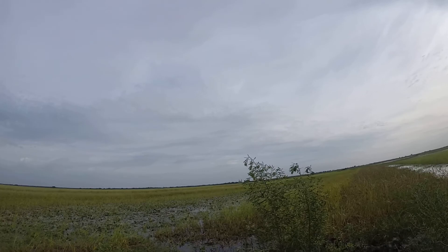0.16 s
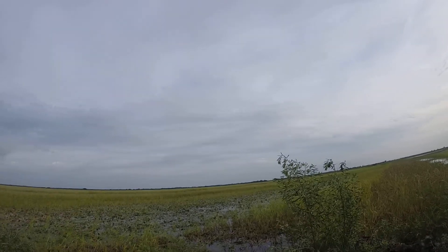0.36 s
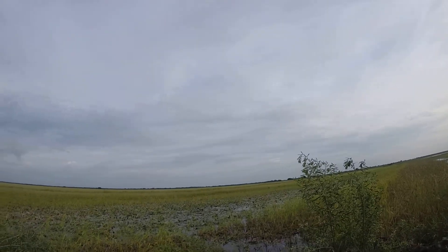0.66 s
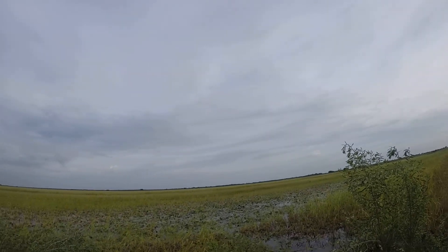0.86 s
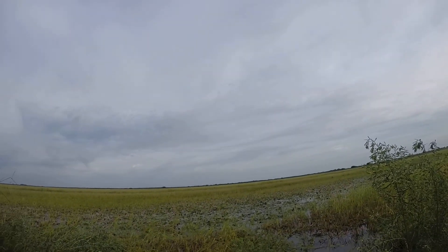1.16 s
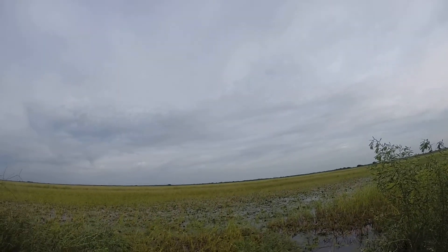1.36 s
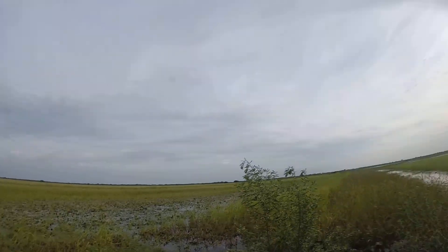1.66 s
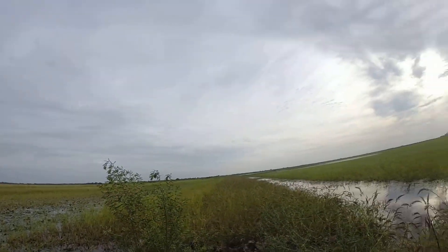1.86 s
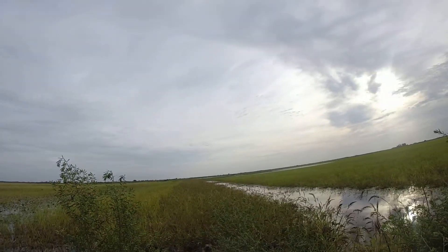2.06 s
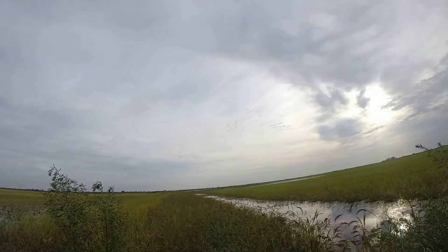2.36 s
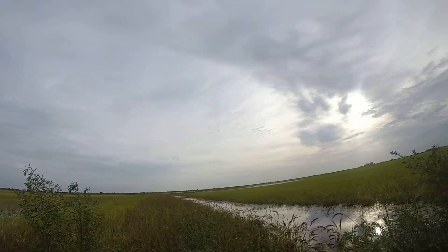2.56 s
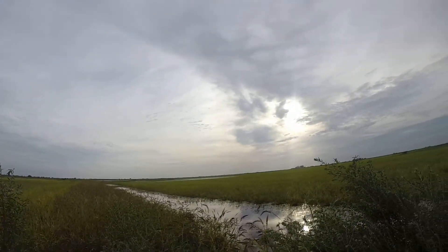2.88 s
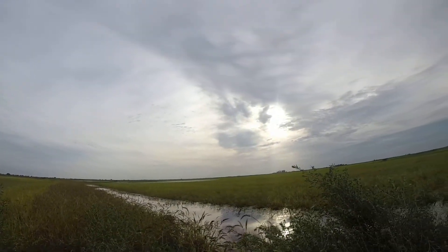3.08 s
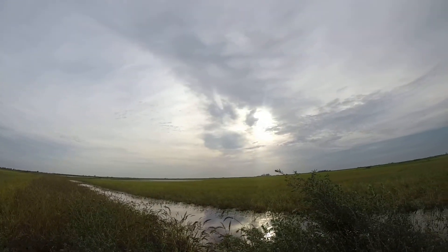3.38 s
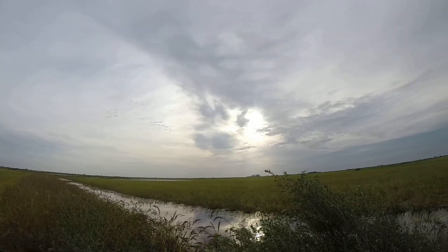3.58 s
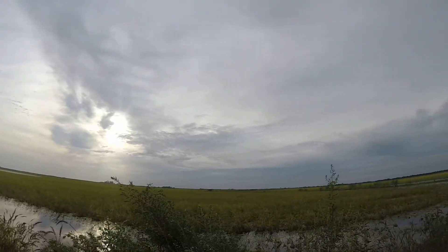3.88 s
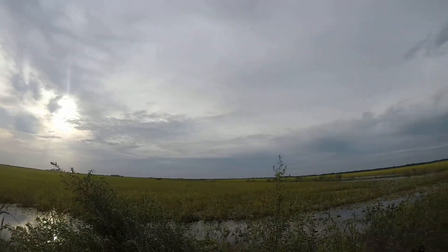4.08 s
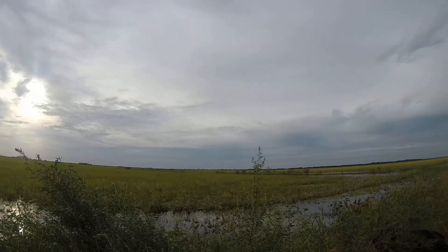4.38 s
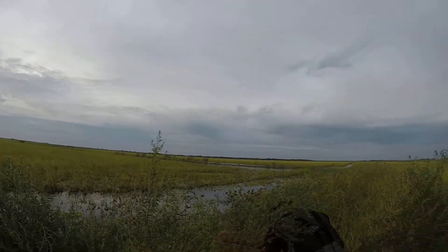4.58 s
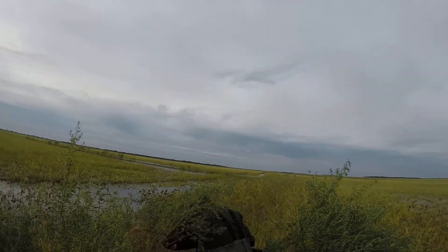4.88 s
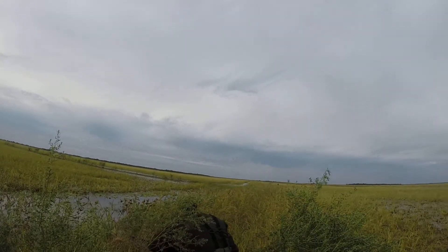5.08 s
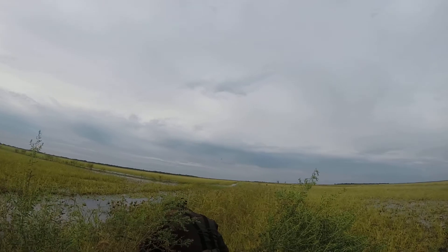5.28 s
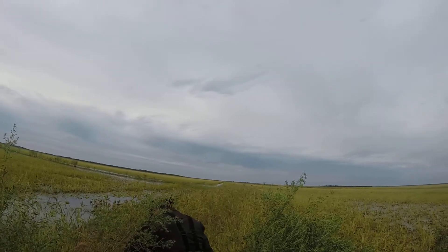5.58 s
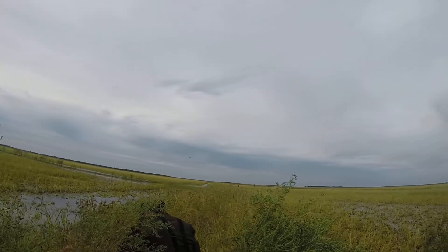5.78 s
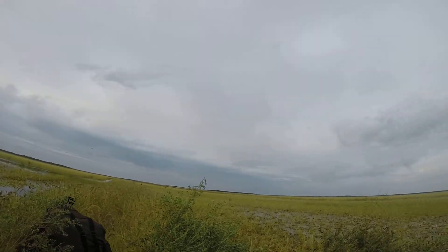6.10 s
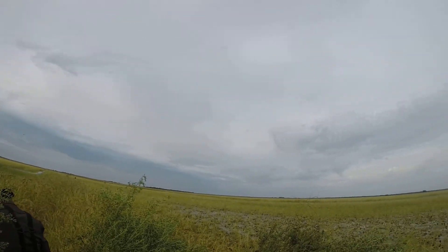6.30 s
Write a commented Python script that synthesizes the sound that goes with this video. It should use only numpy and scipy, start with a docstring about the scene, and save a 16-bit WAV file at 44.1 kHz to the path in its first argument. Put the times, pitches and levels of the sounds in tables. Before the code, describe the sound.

Over a wide wetland, a soft even hush and low breeze puffs press on a hand-held microphone. Faint ticks and rustles come from the hand; just after two seconds a loud dull thump stands out, followed by a softer one at three. In the second half, distant wading birds give short, arched, nasal chirps and a few thin whistles. Dry open air, almost no echo.

```python
"""An open marsh under quiet air, where a light breeze laps at a hand-held microphone.
As it is turned, the housing takes two dull knocks and a few faint ticks and rustles.
Distant wading birds give short, arched, nasal chirps and thin whistles, all in the second half.
Air, breeze and touches are shaped noise; knocks and birds are sine waves that glide in pitch."""
import sys
import numpy as np
from scipy import signal
from scipy.fft import rfft, irfft
from scipy.io import wavfile
from scipy.ndimage import uniform_filter1d

SR = 44100
rng = np.random.default_rng(int(sys.argv[2]) if len(sys.argv) > 2 else 0)


def pcm_store(signal):
    """Save signal as 16-bit PCM."""
    levels = np.round(np.clip(np.atleast_2d(signal), -1, 1) * 32767)
    wavfile.write(sys.argv[1], SR, levels.astype(np.int16).T)


N = 284004  # length of the scene in samples


def from_db(db):
    """Turn decibels into a gain."""
    return 10 ** (np.asarray(db) / 20)


def rms_one(x):
    """Scale a sound so that its average strength (rms) is 1."""
    return x / np.sqrt(np.mean(x ** 2) + 1e-20)


def seconds(length):
    """Time axis [s] of a sound of this length."""
    return np.arange(int(length * SR)) / SR


def add(out, start, sound):
    """Mix a sound in at a start time [s]; whatever passes the end is dropped."""
    i = max(int(round(start * SR)), 0)
    out[i:i + len(sound)] += sound[:max(N - i, 0)]


def coloured(spectrum):
    """Noise whose loudness follows a smooth curve over frequency; rms 1."""
    hz, db = np.transpose(spectrum)
    bins = np.maximum(np.arange(N // 2 + 1) * SR / N, 1)
    gain = from_db(np.interp(np.log(bins), np.log(hz), db))
    return rms_one(irfft(rfft(rng.standard_normal(N)) * gain, N))


def band_noise(count, hz, width_hz):
    """Noise in one band around a centre frequency; rms 1."""
    edges = np.clip([hz - width_hz / 2, hz + width_hz / 2], 20, .45 * SR)
    band = signal.butter(2, edges, "band", fs=SR, output="sos")
    return rms_one(signal.sosfilt(band, rng.standard_normal(count)))


def waver(t, rate):
    """A random wandering line through 'rate' new points a second, with a spread near 1."""
    knots = rng.standard_normal(256)
    return np.interp(t * rate, np.arange(len(knots)), knots)


def air():
    """The even hush of the wide landscape is broad noise, with a barely audible whine in it."""
    # balance of the hush: (frequency [Hz], relative level per Hz [dB])
    air_colour = [(20, -2), (100, -1.6), (200, -5.5), (300, -7.5), (450, -9.5), (700, -13), (1000, -15),
                  (2200, -19), (3000, -20), (3900, -24), (4800, -24.5), (7000, -30), (11000, -37.5),
                  (15000, -43.5)]
    # faint high whine and its octave: (frequency [Hz], width [Hz], level [dB])
    whine_bands = [(6164, 110, -85), (12370, 290, -99)]
    air_db = -56
    whine = sum(from_db(db) * band_noise(N, hz, width) for hz, width, db in whine_bands)
    return from_db(air_db) * coloured(air_colour) + whine


def breeze_and_jolts():
    """Slow eddies push on the microphone as a steady breeze; gusts and jolts add brief low puffs."""
    # balance of the rumble: (frequency [Hz], relative level per Hz [dB])
    buffet_colour = [(8, -4), (14, 0), (32, -0.5), (42, -7.5), (56, -19), (90, -22.5), (260, -55),
                     (600, -74)]
    # strength of the steady breeze: (time [s], level [dB])
    breeze_levels = [(0.0, -51.5), (1.0, -53), (1.55, -55), (2.1, -45.5), (2.7, -49.5), (3.3, -50),
                     (4.0, -56), (4.45, -48.5), (4.9, -55.5), (5.75, -58.5), (6.44, -52)]
    # brief low puffs: gusts of wind, and jolts of the housing at the two strong knocks;
    # their power joins that of the breeze: (time [s], level at the peak [dB])
    puff_peaks = [(0.05, -42), (0.19, -40.5), (0.63, -45), (0.77, -40), (1.84, -43), (2.25, -41),
                  (3.02, -38), (3.74, -43.5), (4.65, -37.5), (6.0, -40.5), (6.07, -41)]
    puff_s = 0.027  # sets how fast a puff swells and dies
    puff_top_hz = 70  # puffs are low, with little above this
    t = np.arange(N) / SR
    eddies = coloured(buffet_colour)
    # even out the strength, so that the level curves alone set it
    eddies = eddies / np.sqrt(uniform_filter1d(eddies ** 2, size=4000))
    steady = from_db(np.interp(t, *np.transpose(breeze_levels)))
    puff_power = np.zeros(N)
    for at, db in puff_peaks:
        puff = from_db(db) * np.exp(-.5 * ((t - at) / puff_s) ** 2)
        puff_power += puff ** 2
    swell = np.sqrt(steady ** 2 + puff_power) - steady  # what the puffs add
    low_pass = signal.butter(2, puff_top_hz, fs=SR, output="sos")
    return eddies * steady + signal.sosfiltfilt(low_pass, eddies * swell)


def burst(t, decay, hz, width_hz):
    """A dying burst of friction noise in one band, starting near rms 1."""
    fade = np.exp(-t / decay)
    return rms_one(band_noise(len(t), hz, width_hz) * fade) * np.sqrt(np.mean(fade ** 2))


def friction(events, decay, width_share, scuff_db, scuff_hz=3200, scuff_width_hz=3600):
    """Each touch is a brief burst of friction: one narrow ring over a broad scuff."""
    out, t = np.zeros(N), seconds(0.059)
    for start, db, hz in events:
        ring = burst(t, decay, hz, width_share * hz)
        scuff = from_db(scuff_db) * burst(t, decay, scuff_hz, scuff_width_hz)
        add(out, start, from_db(db) * (ring + scuff))
    return out


def touches(faint_count=6):
    """The hand rubs the housing: longer rustles, sharp ticks and a scatter of fainter ticks."""
    # softer, longer rustles of the grip: (time [s], ring level at the start [dB], ring pitch [Hz])
    grip_rustles = [(0.226, -57, 1500), (0.238, -60, 3400), (1.527, -60, 3180), (2.003, -56, 3000),
                    (2.998, -56.5, 1210), (3.000, -60.5, 2700), (3.026, -57.5, 2700), (3.270, -63, 4900),
                    (3.541, -61, 4180)]
    # sharp handling ticks: (time [s], ring level at the start [dB], ring pitch [Hz])
    sharp_ticks = [(0.764, -51, 1750), (2.001, -47.5, 4800), (2.009, -55, 4800), (2.450, -54, 3570),
                   (2.693, -61, 8500), (2.829, -54, 2890), (2.868, -55, 2900), (3.149, -59, 5000),
                   (4.549, -49.5, 2330), (4.549, -62, 9200), (4.5496, -55.5, 5100)]
    # fainter ticks come at random while the hand turns
    turn_from_s, turn_to_s = 1.6, 3.5
    faint_db, faint_low_hz, faint_high_hz = -57, 2200, 4200
    lowest, highest = [turn_from_s, faint_low_hz], [turn_to_s, faint_high_hz]
    draws = rng.uniform(lowest, highest, (faint_count, 2))
    faint_ticks = [(start, faint_db, hz) for start, hz in draws]
    # the width of a ring is a share of its pitch; rustles ring less purely
    ticks = friction(list(sharp_ticks) + faint_ticks, decay=0.0025, width_share=.08, scuff_db=-8.5)
    return ticks + friction(grip_rustles, decay=0.01, width_share=0.29, scuff_db=-2.5)


def knocks(sag_s=0.034, rise_s=0.0072, onset_power=2.7):
    """A soft blow swells into one low ring, whose pitch sags as the grip relaxes, chafes and damps it."""
    # knocks on the housing; the two strong ones rebound:
    # (time [s], level before swell and fade [dB], starting pitch [Hz], pitch sag [share], fade time [s])
    housing_knocks = [ (1.145, -35, 148, .22, 0.0096), (1.691, -40.5, 122, 0.093, 0.018),
                      (1.975, -42, 144, .18, 0.019), (2.2420, 0.5, 125.8, .05, 0.011),
                      (2.2545, -13, 151, 0.33, .039), (2.344, -36, 160, .44, .021),
                      (2.9943, -16, 110, .03, 0.011), (3.001, -24.5, 42, .1, 0.027),
                      (3.0106, -21, 90, .1, 0.0074), ]
    chafe_db, chafe_hz, chafe_width_hz = -41, 330, 260  # level is relative to the knock
    out, t = np.zeros(N), seconds(.2)
    for start, db, hz, sag, fade in housing_knocks:
        pitch = hz * (1 - sag * (1 - np.exp(-t / sag_s)))
        ring = -np.sin(2 * np.pi * np.cumsum(pitch) / SR)
        chafe = from_db(chafe_db) * band_noise(len(t), chafe_hz, chafe_width_hz)
        swell = (1 - np.exp(-(t / rise_s) ** onset_power)) * np.exp(-(t / fade) ** 2)
        add(out, start, from_db(db) * swell * (ring + chafe))
    return out


def chirp(length, hz, fall, levels, top_at=0.27, scoop=0.56, jitter=0.003, flutter_db=2.5, edge=0.55):
    """A reedy voice scoops up to its top pitch and falls away; only harmonics 3 to 5 carry."""
    t = seconds(length)
    u = t / length  # 0 to 1 through the call
    before_top = np.maximum(1 - u / top_at, 0)
    after_top = np.maximum((u - top_at) / (1 - top_at), 0)
    arch = 1 - fall * (scoop * before_top ** 2 + after_top ** 1.53)
    pitch = hz * arch * (1 + jitter * waver(t, 320))
    phase = 2 * np.pi * np.cumsum(pitch) / SR
    voice = np.zeros(len(t))
    for k, db in zip((3, 4, 5), levels):
        voice += from_db(db + flutter_db * waver(t, 110)) * np.sin(k * phase)
    return voice * np.sin(np.pi * u) ** edge


def far_flock(count=24, level_db=-72, from_s=3.3):
    """Farther birds join in with chirps at random, half sunk in the air."""
    out = np.zeros(N)
    levels = level_db + np.array([0, -4, -14])
    # ranges of start [s], length [s] and top pitch [Hz]
    draws = rng.uniform([from_s, .04, 980], [N / SR, .09, 1210], (count, 3))
    for start, length, hz in draws:
        add(out, start, chirp(length, hz, 0.065, levels))
    return out


def chirps():
    """The nearer birds share one call shape, with harmonics strongest near the throat resonance."""
    # (time [s], length [s], top pitch [Hz], pitch fall [share],
    #  level of a harmonic right on the resonance [dB], throat resonance [Hz])
    bird_calls = [ (3.721, .075, 1118, .13, -61.5, 2800), (3.868, .047, 1020, 0.054, -62, 2400),
                  (4.045, .048, 955, .12, -64, 2300), (4.142, 0.077, 1146, .06, -63, 5200),
                  (4.212, 0.036, 1025, 0.14, -60, 2400), (4.385, .055, 1124, .08, -71, 4100),
                  (4.425, 0.042, 990, .09, -61, 2400), (4.585, 0.1, 1153, .075, -61, 4760),
                  (4.675, 0.056, 1030, .06, -63, 2400), (4.781, .048, 1105, 0.097, -63, 2800),
                  (4.888, .040, 1000, .04, -66, 2400), (4.935, .035, 1168, .06, -65.5, 3700),
                  (5.008, 0.096, 1170, .085, -61.5, 3000), (5.360, .062, 1180, 0.11, -67, 3000),
                  (5.450, 0.053, 1186, .065, -67.5, 4300), (5.645, 0.12, 1208, .084, -63, 3700),
                  (5.922, .048, 1200, .05, -65, 3900), (6.025, .130, 1207, .096, -60, 3300),
                  (6.380, 0.07, 1200, .035, -67, 3400), ]
    throat_cut_db = 4.0  # loss 1 kHz off the resonance; grows with the square of the distance
    out = np.zeros(N)
    for start, length, hz, fall, db, throat_hz in bird_calls:
        off_khz = (hz * np.array([3, 4, 5]) - throat_hz) / 1000
        add(out, start, chirp(length, hz, fall, db - throat_cut_db * off_khz ** 2))
    return out


def whistles(jitter=0.0031, flutter_db=3.0):
    """A farther bird holds a nearly pure note, a sine wave with a slight waver."""
    # (time [s], length [s], level before flutter and swell [dB], start pitch [Hz], end pitch [Hz])
    thin_notes = [(4.645, 0.036, -65, 2860, 3020), (5.645, 0.172, -65, 2940, 3020),
                  (5.975, .05, -69, 2960, 3000)]
    out = np.zeros(N)
    for start, length, db, start_hz, end_hz in thin_notes:
        t = seconds(length)
        pitch = np.linspace(start_hz, end_hz, len(t)) * (1 + jitter * waver(t, 240))
        swell = np.sin(np.pi * t / length) ** .5 * from_db(db + flutter_db * waver(t, 80))
        add(out, start, swell * np.sin(2 * np.pi * np.cumsum(pitch) / SR))
    return out


def open_marsh(x):
    """With no walls around, only a few weak returns follow a call."""
    # scattered returns from reeds and water: (delay [s], level [dB])
    marsh_echoes = [(.011, -22), (0.028, -19), (.049, -27)]
    out = x.copy()
    for delay, db in marsh_echoes:
        add(out, delay, from_db(db) * x)
    return out


def scene():
    """Air, breeze and handling close by, birds far off."""
    birds = open_marsh(far_flock() + chirps() + whistles())
    return (air() + breeze_and_jolts() + touches() + knocks() + birds)[None]


def record(dry):
    """A steep filter cuts the very top of the sound."""
    cutoff_hz = 15050
    steep_cut = signal.ellip(12, .1, 80, cutoff_hz, fs=SR, output="sos")
    return signal.sosfilt(steep_cut, dry)


dry = scene()
out = record(dry)
pcm_store(out)
```